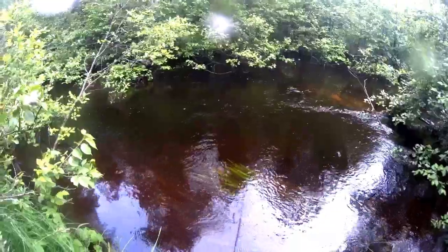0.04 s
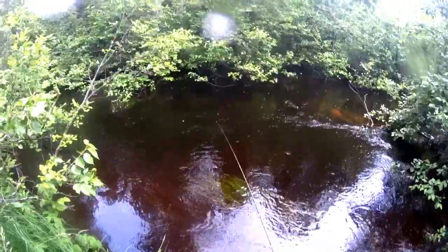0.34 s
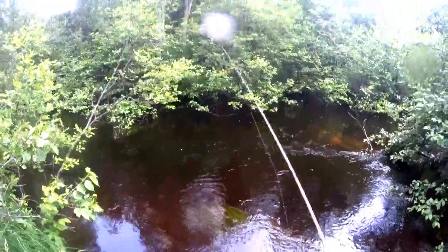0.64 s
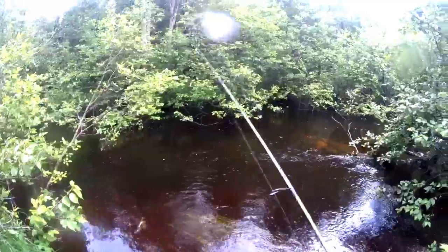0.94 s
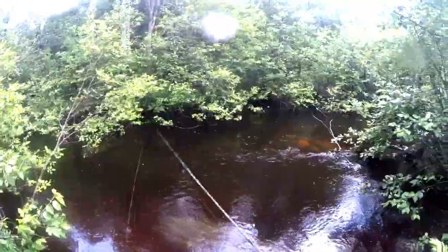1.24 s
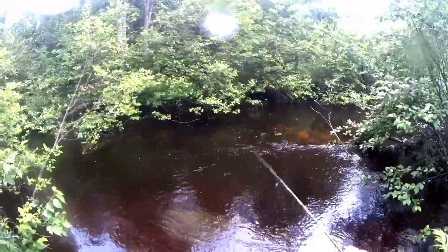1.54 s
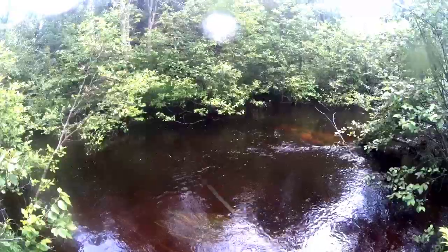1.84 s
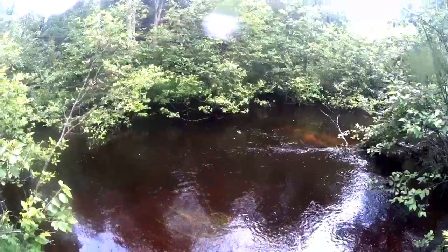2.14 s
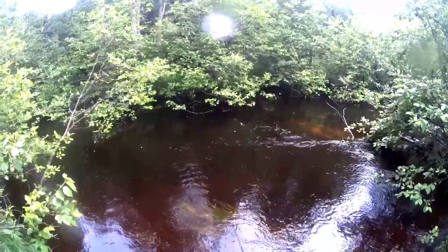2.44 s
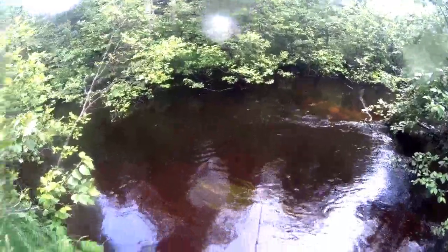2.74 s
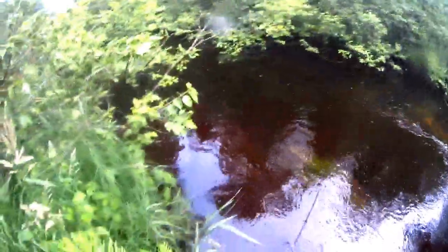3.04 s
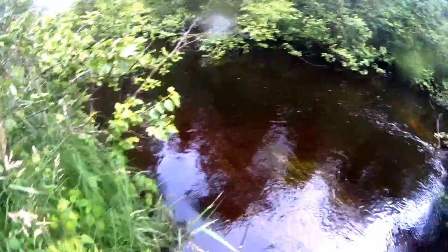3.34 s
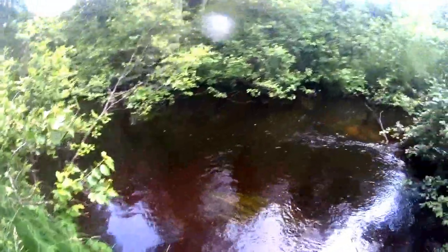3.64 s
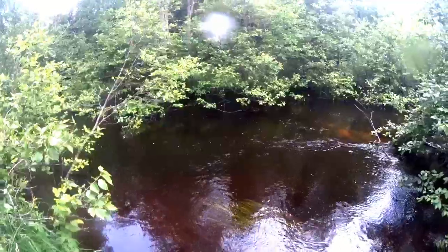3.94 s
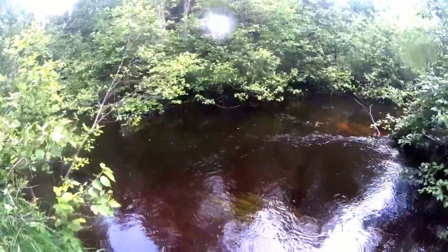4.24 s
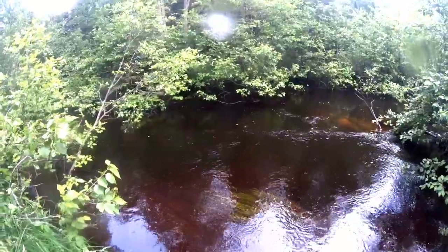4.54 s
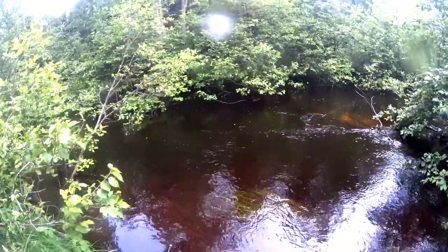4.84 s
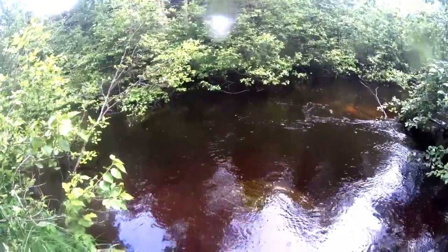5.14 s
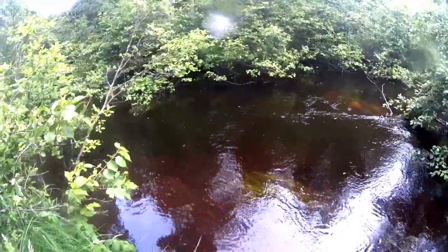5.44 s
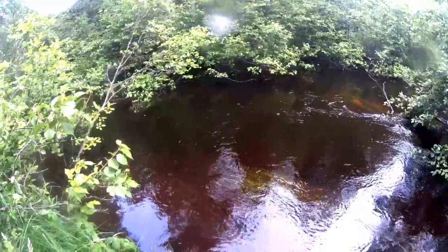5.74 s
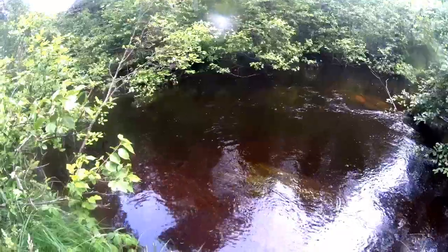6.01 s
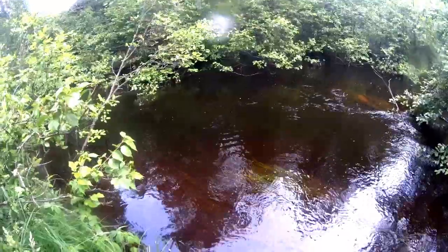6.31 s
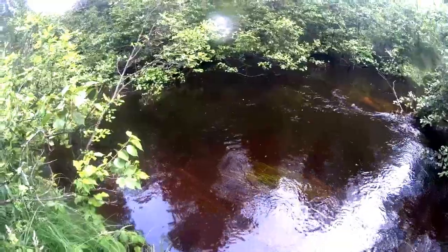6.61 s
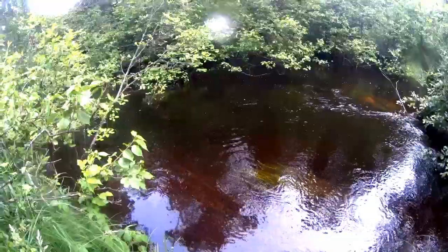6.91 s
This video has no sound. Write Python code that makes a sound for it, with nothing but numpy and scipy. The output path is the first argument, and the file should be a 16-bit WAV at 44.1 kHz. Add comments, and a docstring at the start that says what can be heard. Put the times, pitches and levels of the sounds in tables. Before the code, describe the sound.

An angler casts and retrieves, heard from inside a waterproof housing worn on the body. A short turn of the reel gives way to a sharp clack, a faint hiss of line, tackle clicks and some rustling knocks. For the second half the spinning reel winds with a throbbing rasp. Scattered raindrops tick and thud on the housing throughout, over the faint, steady wash of a creek.

```python
"""Creekside fishing in light rain

Heard from inside a waterproof camera housing worn by an angler. Over the steady wash of the water,
drops flex the case into thumps and ring it with ticks. Tackle clacks, a cast lets line hiss off the
spool and a sleeve rustles; then the spinning reel winds in, its rasp throbbing with the rotor."""
import sys
import numpy as np
from scipy import signal
from scipy.fft import rfft, irfft, next_fast_len
from scipy.io import wavfile
from scipy.ndimage import uniform_filter1d

SR = 44100
rng = np.random.default_rng(int(sys.argv[2]) if len(sys.argv) > 2 else 0)


def master(y):
    """Save y as 16-bit WAV."""
    cut = np.clip(np.atleast_2d(y).T, -1, 1)
    pcm = np.round(cut * 32767)  # scale
    wavfile.write(sys.argv[1], SR, pcm.astype(np.int16))


N = 316197
T = np.arange(N) / SR


def undb(db):
    """Decibels to gain."""
    return 10 ** (np.asarray(db) / 20)


def unit(x):
    """Scale to rms 1."""
    return x / np.sqrt(np.mean(x ** 2))


def curve(rows):
    """An automation curve: straight lines between (t/s, value) rows."""
    return np.interp(T, *np.transpose(rows))


def bell(f, centre_hz, octaves):
    """A bell on a log-frequency axis, peak 1."""
    return np.exp(-.5 * (np.log2(np.maximum(f, 1) / centre_hz) / octaves) ** 2)


def colour(x, eq):
    """Filter by an EQ curve of (f/Hz, gain/dB) rows."""
    hz, db = np.transpose(eq)
    f = np.maximum(np.fft.rfftfreq(len(x), 1 / SR), 1)
    return irfft(rfft(x) * undb(np.interp(np.log(f), np.log(hz), db)), len(x))


def noise(eq):
    """White noise through an EQ curve, rms 1."""
    return unit(colour(rng.standard_normal(next_fast_len(N)), eq)[:N])


def wander(per_second):
    """A random modulator that glides to a new value per_second times a second, rms 1."""
    knots = rng.standard_normal(2048)
    return unit(np.interp(T * per_second, np.arange(len(knots)), knots))


def grains(eq, per_second, scatter_db):
    """Dense tiny clicks of uneven size through an EQ curve, rms 1."""
    size = next_fast_len(N)
    clicks = (rng.random(size) < per_second / SR) * rng.choice([-1, 1], size)
    gains = undb(scatter_db * rng.standard_normal(size))
    return unit(colour(clicks * gains, eq)[:N])


def stereo(mid, side):
    """Left and right from mid and side."""
    return np.array([mid + side, mid - side])


def add(track, start, sound):
    """Mix a sound in at start seconds."""
    i = int(start * SR)
    track[..., i:i + sound.shape[-1]] += sound[..., :N - i]


# EQ of the water bed: f/Hz, gain/dB
CREEK_EQ = [(15, -39), (25, -8), (59, -8.5), (165, -6), (223, -4), (254, -5), (603, -4), (1200, -4.5),
            (1330, -2.5), (1470, -1), (1850, -4), (2640, -2.5), (3160, -7.5), (4510, -5), (11000, -30.5),
            (14300, -100), (22000, -120)]
# its stereo width: f/Hz, side minus mid/dB
CREEK_WIDTH = [(60, -14.5), (250, -4), (600, 3), (1100, 3.5), (1700, -1), (2500, -0.5), (5000, -7.5),
               (9000, 3)]


def creek(wash_db=-64, flicker_db=1.0, patter_db=-72, hollow_hz=2420, hollow_width_hz=330, hollow_db=-70):
    """Steady wash of water with a faint patter of rain on leaves; the case adds a hollow ring."""
    wash = stereo(noise(CREEK_EQ), colour(noise(CREEK_EQ), CREEK_WIDTH))
    wash *= undb(wash_db + flicker_db * wander(21))
    patter = grains(CREEK_EQ[len(CREEK_EQ) // 2:], per_second=250, scatter_db=5.5)
    patter = signal.sosfilt(signal.butter(2, 1200, "high", fs=SR, output="sos"), patter)
    case_peak = signal.iirpeak(hollow_hz, hollow_hz / hollow_width_hz, fs=SR)
    hollow = signal.lfilter(*case_peak, rng.standard_normal(N))
    return wash + undb(patter_db) * unit(patter) + undb(hollow_db) * unit(hollow)


# pings, a squeak, faint far whistles and a plop: t/s, length/s, start f/Hz, end f/Hz, level/dB
TONES = [(.202, .014, 2820, 2780, -42), (.3255, .006, 4250, 4200, -44), (.328, .011, 10000, 9900, -51),
         (.329, .019, 5870, 5830, -41.5), (.8, .22, 2420, 2580, -58), (.97, .18, 2560, 2360, -56),
         (1.35, .14, 2470, 2350, -58), (2.07, .09, 220, 310, -63.5), (3.355, .09, 2540, 2400, -58)]


def tones(waver=0.04):
    """Short gliding tones that swell and fade; the longer ones are more unsteady."""
    out, longest = np.zeros(N), max(row[1] for row in TONES)
    for start, length, first_hz, last_hz, db in TONES:
        size = int(length * SR)
        wobble = waver * np.sqrt(length / longest) * wander(312)[:size]
        hz = np.linspace(first_hz, last_hz, size) * (1 + wobble)
        add(out, start, undb(db) * np.hanning(size) * np.sin(2 * np.pi * np.cumsum(hz) / SR))
    return out


def friction(levels, eq, flutter_db, side_db):
    """A soft, grainy rubbing hiss that flutters around a level curve."""
    hiss = grains(eq, per_second=8000, scatter_db=3)
    gain = undb(curve(levels) + flutter_db * wander(60))
    return gain * stereo(hiss, undb(side_db) * noise(eq))


# fader ride of the cloth rustle: t/s, level/dB
SLEEVE_LEVEL = [(2.0, -89), (2.1, -73), (2.52, -75), (2.62, -59), (2.78, -58.5), (3.05, -68.5),
                (3.3, -71.5), (3.51, -67), (3.7, -93)]
# its midrange EQ: f/Hz, gain/dB
SLEEVE_EQ = [(100, -5), (400, -6.5), (850, -8), (1250, 4.5), (1750, 7), (2050, -16), (2400, 7), (3300, -43),
             (7000, -64)]


def sleeve():
    """A sleeve rubs near the housing."""
    return friction(SLEEVE_LEVEL, SLEEVE_EQ, flutter_db=3.0, side_db=-20)


# fader ride of the line hiss: t/s, level/dB
LINE_LEVEL = [(.75, -67), (1.0, -63.5), (1.15, -73), (1.8, -74), (2.08, -63), (2.35, -63), (2.6, -63),
              (3.1, -67.5), (3.22, -61), (3.6, -83)]
# its bright EQ: f/Hz, gain/dB
LINE_EQ = [(1000, -12), (2500, 0), (4800, 0), (6500, -11.5), (8300, -15), (10500, -22)]


def line_hiss():
    """Line rubs as it runs off the spool."""
    return friction(LINE_LEVEL, LINE_EQ, flutter_db=2.8, side_db=-15)


# swell of the whizz: t/s, level/dB
WHIZZ_LEVEL = [(1.4, -80), (1.68, -74.5), (1.82, -66), (1.97, -68.5), (2.15, -87), (2.3, -100)]
# its airy EQ: f/Hz, gain/dB
WHIZZ_EQ = [(3000, -33), (5700, 3), (8300, -0.5), (9200, -2.5), (10700, -9)]


def line_whizz():
    """At full speed the line adds a thin whizz."""
    return friction(WHIZZ_LEVEL, WHIZZ_EQ, flutter_db=1.5, side_db=-17)


def flex(first_hz, rest_hz, length_s, settle_s=0.0022, rise_s=0.0007):
    """One flex of the case wall: fast bending waves arrive first, so the blow falls in pitch."""
    t = np.arange(4096) / SR
    cycles = rest_hz * t + (first_hz - rest_hz) * settle_s * (1 - np.exp(-t / settle_s))
    envelope = (1 - np.exp(-t / rise_s)) * np.exp(-(t / length_s) ** 2.6)
    return -envelope * np.sin(2 * np.pi * cycles)


# soft raindrops that only flex the case: t/s, level/dB, start f/Hz
SOFT_DROPS = [(1.0951, -40, 625), (3.32, -52.5, 438), (3.368, -53, 230), (3.4286, -54, 345),
              (3.844, -51, 295), (3.905, -52.5, 279), (4.08, -51, 279), (4.1334, -54, 220),
              (4.29, -40, 464), (4.6194, -36.5, 620), (5.112, -44.3, 302), (5.162, -48, 286),
              (5.268, -38, 660), (5.3889, -41.5, 680), (5.428, -43, 433), (6.3677, -44.5, 332),
              (6.9849, -35.5, 710)]
# hard raindrops, a tap (in ticks) then a thump: t/s, thump level/dB, tap level/dB, tap centre f/Hz
HARD_DROPS = [(.4673, -40.5, -44.5, 1090), (0.7457, -40, -49.5, 800), (2.5815, -38.5, -44.5, 790),
              (3.469, -41.5, -43.5, 1160), (5.0116, -40.3, -46, 890), (5.747, -39.5, -50.5, 750),
              (5.8635, -41, -54, 700)]
# bumps as the camera is jostled: t/s, level/dB, start f/Hz, length/s
KNOCKS = [(2.675, -35, 470, 0.01), (2.7085, -32.5, 300, 0.0029), (2.719, -47, 260, 0.012),
          (2.746, -39, 270, 0.0043), (2.804, -35.5, 284, 0.0053), (3.038, -46, 288, 0.0056),
          (3.054, -57, 277, 0.026), (3.4715, -34, 650, 0.002)]


def thumps(hard_lag_s=.0044, hard_hz=316, cavity_hz=230, cavity_width_hz=90, cavity_db=-6, side_db=-26):
    """Drops and knocks flex the wall of the case; the air inside adds a hollow body."""
    out = np.zeros(N)
    after_taps = [(start + hard_lag_s, db, hard_hz) for start, db, _, _ in HARD_DROPS]
    for start, db, first_hz in list(SOFT_DROPS) + after_taps:
        rest_hz = 121 * (first_hz / 400) ** 0.08  # a drop that starts higher ends a little higher
        add(out, start, undb(db) * flex(first_hz, rest_hz, length_s=.0172))
    for start, db, first_hz, length in KNOCKS:
        add(out, start, undb(db) * flex(first_hz, rest_hz=142, length_s=length))
    cavity = signal.lfilter(*signal.iirpeak(cavity_hz, cavity_hz / cavity_width_hz, fs=SR), out)
    low_cut = signal.butter(2, 55, "high", fs=SR, output="sos")
    out = signal.sosfilt(low_cut, out + undb(cavity_db) * cavity)
    return stereo(out, undb(side_db) * out)


# ringing modes of the housing: f/Hz, bandwidth/Hz, gain/dB
HOUSING_MODES = [(622, 90, 5.5), (1230, 690, 6), (1500, 320, 6), (1755, 96, -4), (2285, 74, -3),
                 (2677, 180, 5), (3830, 120, -7), (4430, 150, -1.5), (4870, 156, 2), (5870, 780, -2),
                 (6870, 220, -5.5), (8440, 300, -4), (9870, 1400, -5)]
# light ticks of small drops and handling: t/s, level/dB, centre f/Hz
LIGHT_TICKS = [(0.444, -47, 2360), (0.5081, -53, 2730), (.593, -53.5, 2800), (0.7684, -42, 2720),
               (.9125, -39.5, 3020), (1.508, -51, 4060), (1.8184, -53, 6370), (1.8465, -51, 5200),
               (2.6023, -50.5, 3360), (2.636, -42.5, 1490), (2.7005, -41.5, 1340), (3.0333, -46, 1490),
               (3.2784, -47, 1680), (3.3374, -47, 1410), (5.238, -51.5, 1590)]
# clicks and clacks of the tackle: t/s, level/dB, centre f/Hz, spread/octaves, decay/s
TACKLE_CLACKS = [(.3268, -48.5, 6300, .95, 0.0018), (1.04, -25.5, 5340, 0.6, 0.0026),
                 (1.048, -29, 3270, 0.53, 0.0027), (1.438, -55.5, 6500, 0.48, .0073),
                 (2.018, -44.5, 4060, 0.58, 0.00057), (2.0249, -41.5, 4100, .6, 0.0076),
                 (2.0273, -39.5, 1730, 0.17, 0.0063), (2.046, -42.5, 2940, 0.65, 0.0056),
                 (2.0771, -43, 1920, 0.42, 0.0037), (2.086, -41.5, 3200, 0.83, 0.0054),
                 (2.272, -42, 5200, .7, .003), (2.279, -30.3, 4950, 0.51, 0.0014),
                 (2.2799, -42, 2360, 0.34, 0.0017), (2.286, -55, 4800, 0.69, 0.0022)]


def ticks(tick_octaves=.48, tick_decay_s=.0018, tap_octaves=.95, tap_decay_s=.002,
          splash_db=-4, rise_s=.00076, tail_db=-27, tail_s=.035, side_db=-14):
    """Each contact rings the housing with a splash of noise; its centre and spread pick which modes ring."""
    light = [(start, db, hz, tick_octaves, tick_decay_s) for start, db, hz in LIGHT_TICKS]
    taps = [(start, db, hz, tap_octaves, tap_decay_s) for start, _, db, hz in HARD_DROPS]
    out, t = np.zeros((2, N)), np.arange(6144) / SR
    f = np.fft.rfftfreq(len(t), 1 / SR)
    hz, width, mode_db = np.transpose(HOUSING_MODES)
    mode_power = undb(2 * mode_db) / (1 + (2 * (f[:, None] - hz) / width) ** 2)
    shell_eq = np.sqrt(mode_power.sum(axis=1)) * f / (f + hz[0])
    modes = np.exp(-np.pi * np.outer(width, t)) * np.sin(2 * np.pi * np.outer(hz, t))
    signs = (-1) ** np.arange(len(hz))
    trim = np.sqrt(.004 * SR / len(t))  # a level is the tick's energy spread over 4 ms
    for start, db, centre_hz, octaves, decay in list(TACKLE_CLACKS) + light + taps:
        ring = (signs * undb(mode_db) * bell(hz, centre_hz, octaves)) @ modes
        envelope = (1 - np.exp(-t / rise_s)) * (np.exp(-t / decay) + undb(tail_db) * np.exp(-t / tail_s))
        white = rfft(rng.standard_normal((2, len(t))))
        splash, side = irfft(white * bell(f, centre_hz, octaves) * shell_eq) * envelope
        low_cut = signal.butter(3, .32 * centre_hz, "high", fs=SR)  # light contacts carry no bass
        mid = unit(signal.lfilter(*low_cut, unit(ring) + undb(splash_db) * unit(splash)))
        add(out, start, undb(db) * trim * stereo(mid, undb(side_db) * unit(side)))
    return out


# the resonance at the peak of each rotor sweep; it sinks early in the retrieve: t/s, f/Hz
ROTOR_RING = [(0, 3900), (3.8, 4700), (4.35, 4600), (4.55, 3660), (7.17, 3550)]


def rotor_sweep(rasp, away, far_hz=5200, octaves=0.17, near_db=6.0, far_db=0.5, flicker_db=2.2):
    """A resonance sinks and strengthens as the rotor comes round; narrow bands flicker on their own."""
    f, t, spectrum = signal.stft(rasp, SR, nperseg=512, noverlap=384)
    away, near_hz = np.interp(t, T, away), np.interp(t, T, curve(ROTOR_RING))
    ring_hz = near_hz + (far_hz - near_hz) * away
    boost_db = (near_db + (far_db - near_db) * away) * bell(f[:, None], ring_hz, octaves)
    flicker = uniform_filter1d(rng.standard_normal(spectrum.shape), size=5, axis=0)  # across bands
    flicker = unit(uniform_filter1d(flicker, size=9, axis=1))  # across time
    spectrum *= undb(boost_db + flicker_db * flicker)
    return signal.istft(spectrum, SR, nperseg=512, noverlap=384)[1][:N]


# spells of even cranking, each starting on a rotor sweep: t/s, sweep rate/Hz
CRANKING = [(-.03, 13.5), (3.786, 14), (4.517, 14), (5.005, 10.8), (5.409, 9.35), (5.84, 7.05),
            (6.124, 9.7), (6.643, 11.6)]
# EQ of the rasp: f/Hz, gain/dB
RASP_EQ = [(500, -35), (1150, -21), (1430, -11), (1800, -10), (2020, -13), (2330, 4.5), (2700, 0),
           (3050, -1), (3480, 1.5), (4500, -0.5), (5100, 1), (6350, -8), (6900, -12.5), (7700, -16.5),
           (8400, -16.5), (9250, -28.5), (9900, -21.5), (10450, -30), (11000, -88)]
# fader ride on top of the speed law, out for the cast and back for the retrieve: t/s, gain/dB
RASP_FADER = [(0, -4), (.045, -2.5), (.11, -12.5), (.19, -13.5), (.4, -42), (3.68, -46), (3.78, -13),
              (3.85, -2.5), (4.1, 0), (4.6, 0), (4.81, 5), (4.88, -2.5), (5.15, .5), (6.55, 1), (6.85, 2),
              (7.17, 0)]


def reel(base_db=-43.5, brisk_hz=15.04, db_per_doubling=7.5, ease_s=0.22,
         dip_db=1.5, flutter_db=0.77, hiss_db=-3, side_db=-18):
    """Wet line and gears rasp in tiny slips, louder at speed and swelling with each rotor sweep."""
    starts, rates = np.transpose(CRANKING)
    spell = np.searchsorted(starts, T) - 1
    away = np.abs(np.sin(np.pi * rates[spell] * (T - starts[spell])))  # 0 on a sweep, 1 midway between
    eased_hz = uniform_filter1d(rates[spell], int(ease_s * SR))
    db = base_db + db_per_doubling * np.log2(eased_hz / brisk_hz) + curve(RASP_FADER)
    db = db - dip_db * away + flutter_db * wander(110)
    rasp = grains(RASP_EQ, per_second=3500, scatter_db=3.5) + undb(hiss_db) * noise(RASP_EQ)
    return undb(db) * stereo(unit(rotor_sweep(rasp, away)), undb(side_db) * noise(RASP_EQ))


def scene():
    """The stereo mix of everything that reaches the housing."""
    cast = line_hiss() + line_whizz() + sleeve()
    impacts = thumps() + ticks()
    return cast + impacts + tones() + reel() + creek()


def record(dry, top_hz=11050):
    """The camera cuts the top with a steep low-pass."""
    return signal.sosfilt(signal.ellip(10, .2, 70, top_hz, fs=SR, output="sos"), dry)


dry = scene()
out = record(dry)
master(out)
```